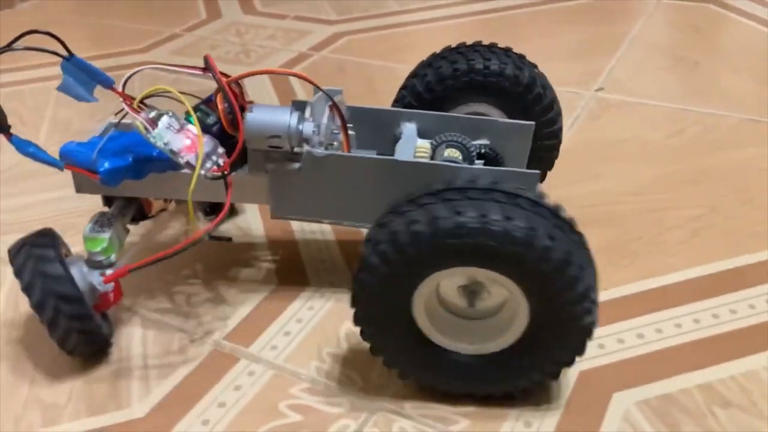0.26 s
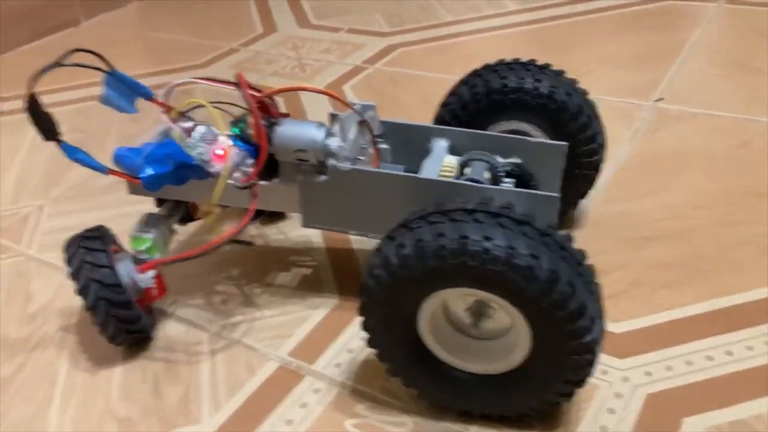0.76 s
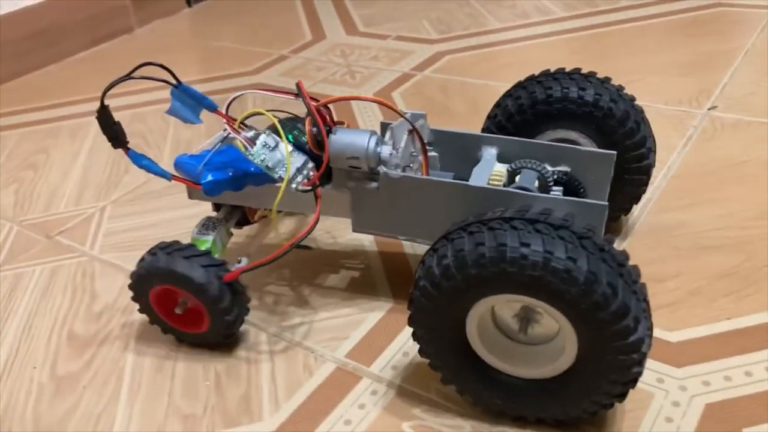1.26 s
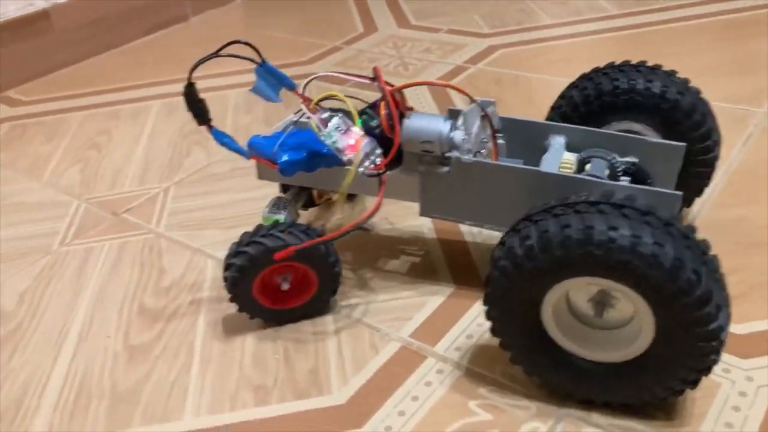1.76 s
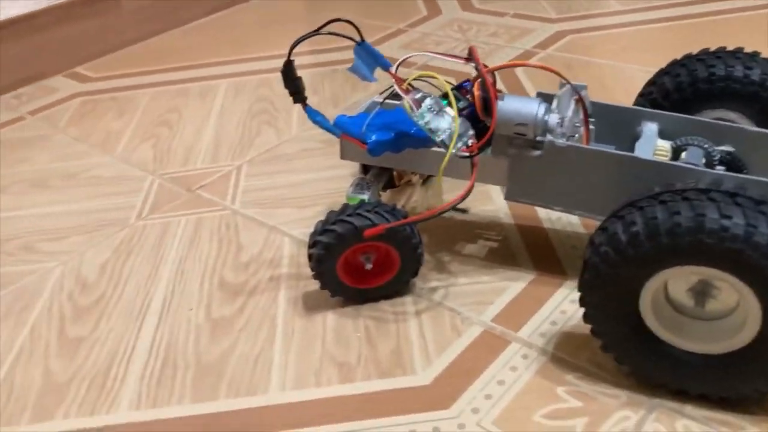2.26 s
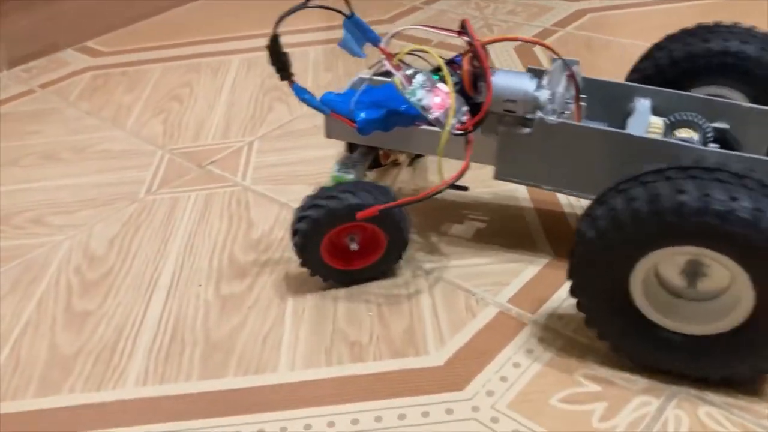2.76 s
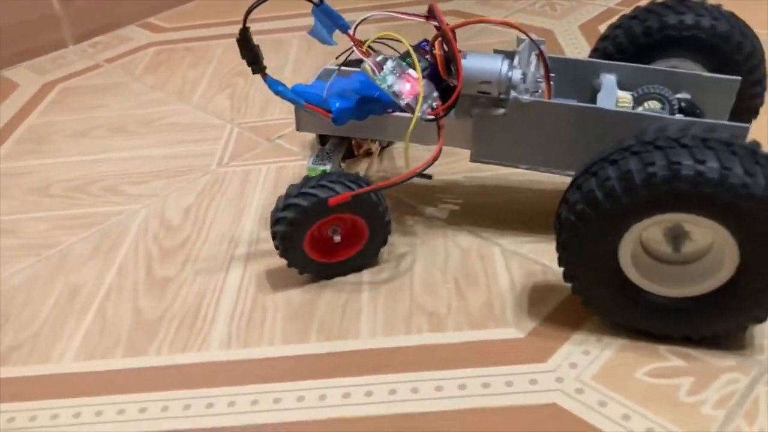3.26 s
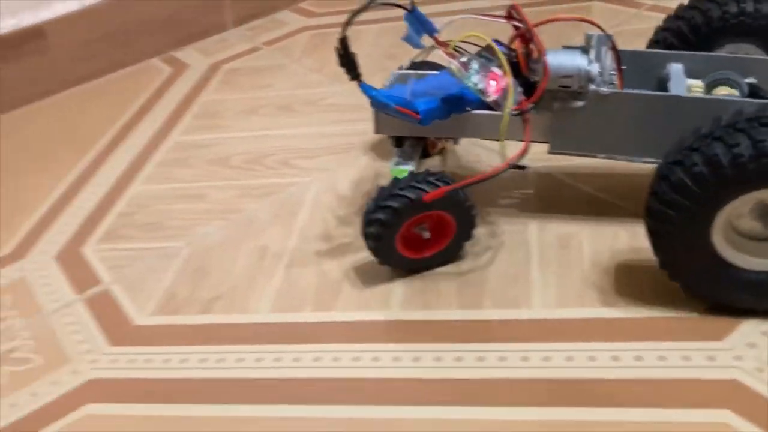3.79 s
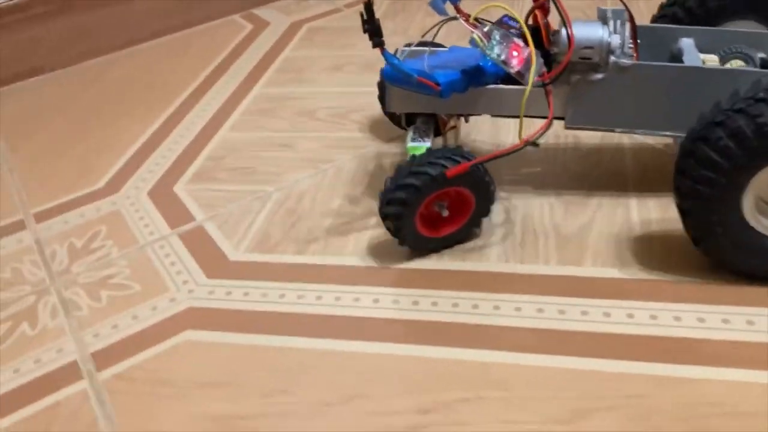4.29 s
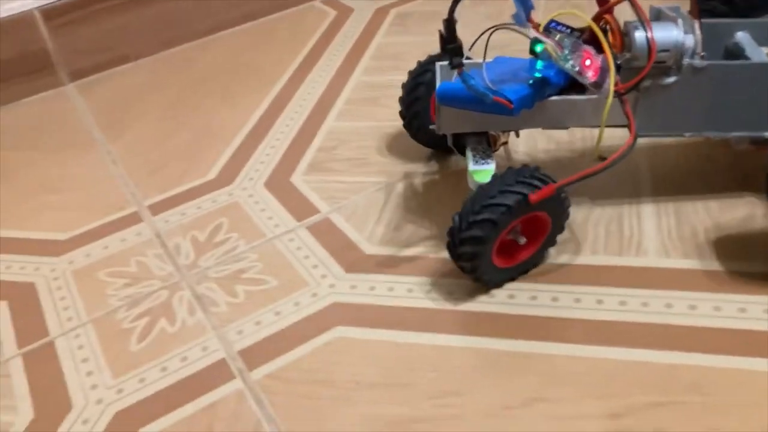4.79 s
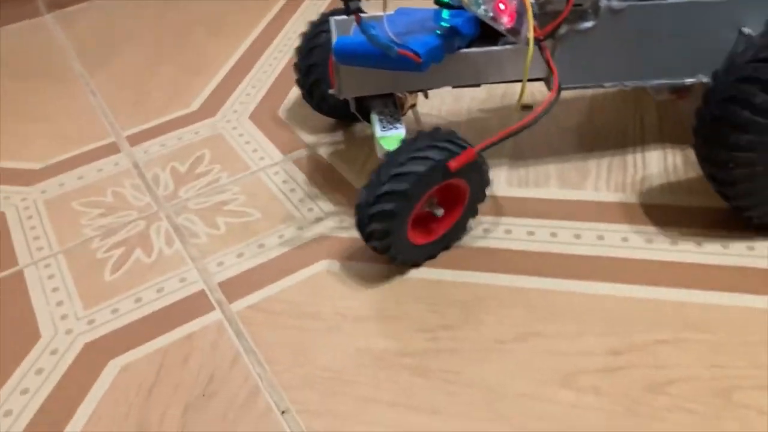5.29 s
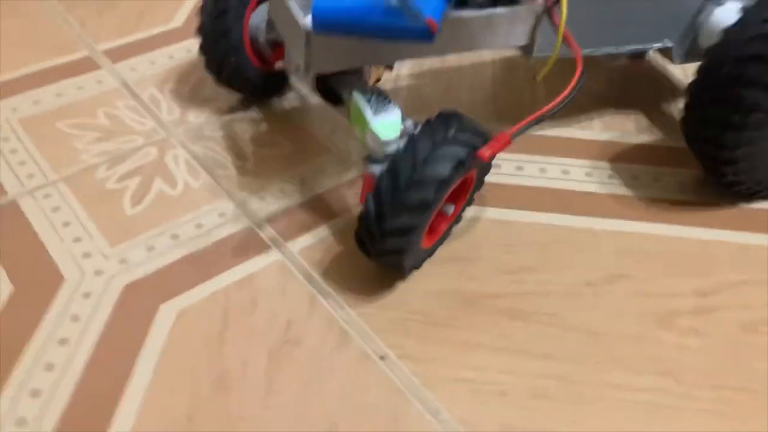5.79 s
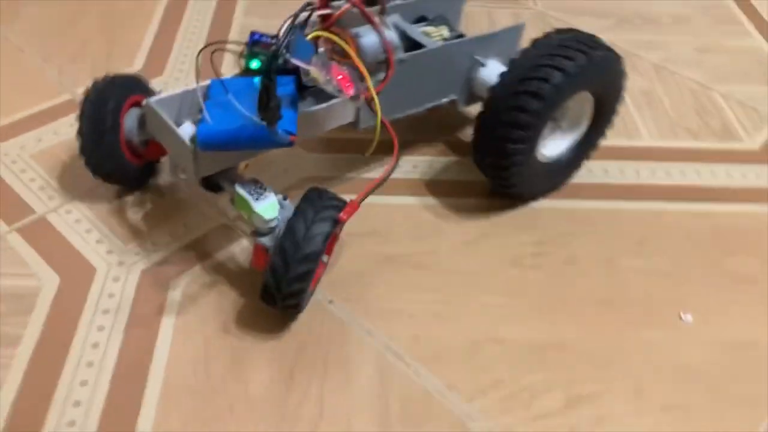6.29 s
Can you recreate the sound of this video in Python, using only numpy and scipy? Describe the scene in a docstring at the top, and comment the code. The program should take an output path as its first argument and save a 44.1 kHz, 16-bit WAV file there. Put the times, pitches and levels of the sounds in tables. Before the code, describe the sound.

Close to the microphone in a room with a hard floor, a toy truck's gear motor rattles brightly and coasts down almost at once. A thinner steering buzz follows with a sharp tick, then a quiet pause with a faint low hum. The motor grinds back to life and whirs steadily to the end, with tyre patter, a hard knock midway and a cluster of ticks and bouncing knocks late.

```python
"""On a hard floor indoors, a toy truck drives close to the microphone, stops, steers and drives on.
Tooth strikes of its gear motor rattle in gears and chassis, and the mesh sings a line with sidebands.
A smaller gear train buzzes as the front wheels steer. Patter and rumble of noise make the tyres.
Dying modes make the chassis knocks, noise bursts the ticks; a low hum swells during the halt.
Room air lies underneath, and two microphone ports hear direct sound and reflections."""
import sys
import numpy as np
from scipy import signal
from scipy.fft import rfft, irfft
from scipy.io import wavfile
from scipy.ndimage import uniform_filter1d

SR = 44100
rng = np.random.default_rng(int(sys.argv[2]) if len(sys.argv) > 2 else 0)


def master_out(mix):
    """Clip the mix to full scale and print it as 16-bit PCM to the path in sys.argv[1]."""
    frames = np.transpose(np.atleast_2d(mix))
    ceiling = np.clip(frames, -1, 1)
    pcm = np.round(ceiling * 32767).astype(np.int16)
    wavfile.write(sys.argv[1], SR, pcm)


N = 288414
TIME = np.arange(N) / SR
BINS = np.fft.rfftfreq(N, 1 / SR)

# Colour of the gear rattle. Each row: frequency in Hz, relative level per Hz in dB.
RATTLE_COLOUR = [(200, -45), (800, -18.5), (1500, -8), (2400, -10), (3200, -4), (4200, -6.5), (5200, -1.5),
                 (6200, -7), (7000, -9.5), (8800, -1), (10500, 3.5), (11300, 0.5), (12100, 6.5),
                 (12700, -1.5), (14500, -6)]
# Colour of the chassis ring. Each row: frequency in Hz, relative level per Hz in dB.
CHASSIS_COLOUR = [(150, -42.5), (450, -11.5), (800, -35), (1050, -15.5), (1320, 2.5), (1480, -5),
                  (1700, 5.5), (2050, -0.5), (2400, -2.5), (3200, -11.5)]
# Dry rasp of the backlash. Each row: frequency in Hz, relative level per Hz in dB.
RASP_COLOUR = [(700, -30), (2000, -3.5), (4300, 0), (6500, -4.5), (10000, -18.5)]
# Bright band near 4 kHz that shifts as floor reflections change with distance.
# Each row: time in seconds, frequency in Hz, level in dB against the rattle.
FLOOR_BAND = [(0, 4565, -11.5), (2.6, 4114, -9.5), (3.3, 4200, -15), (3.9, 4250, -8), (4.5, 4050, -13.5),
              (5.0, 3890, -10), (5.4, 4180, -18), (6.0, 4300, -38), (6.54, 4300, -36)]
# Faint, narrow ring, perhaps of the motor bracket. Each row: time in seconds, level in dB against the rattle.
BRACKET_RING = [(0, -21.5), (2.6, -24), (4.0, -19), (4.6, -17), (5.9, -17), (6.54, -21)]
# Treble sizzle of the gears. Each row: time in seconds, level in dB against the rattle.
SIZZLE_LEVEL = [(0, -7.5), (.3, -7), (2.7, -7.5), (3.3, -7.5), (3.8, -11.5), (4.8, -11), (5.45, -9.5),
                (5.7, -13), (5.95, -8), (6.2, -11), (6.54, -7.5)]
# Loudness of the gear rattle under load. Each row: time in seconds, level in dB before trim and flutter.
RATTLE_LOAD = [(0.1, -29), (2.6, -28.5), (2.8, -28), (3.3, -27), (3.65, -28), (3.9, -27.5), (4.7, -27.5),
               (5.1, -29.5), (5.2, -27), (5.38, -28), (5.48, -26), (5.8, -26.5), (6.2, -27), (6.54, -30.5)]
# How hard the teeth bite under the changing load.
# Each row: time in seconds, whine in dB before trim, chassis ring in dB before trim and flutter.
TOOTH_BITE = [(0, -46.5, -40), (.08, -45, -41), (0.22, -48, -45), (0.31, -43, -40), (0.38, -58, -39),
              (2.55, -54, -40), (2.65, -43.5, -44), (2.73, -56, -51), (2.81, -43, -34), (2.87, -47.5, -44),
              (2.94, -40.5, -39), (3.18, -53, -38), (3.3, -40.5, -38), (3.5, -57, -37.5),
              (3.65, -51, -41.5), (3.92, -49, -37.5), (4.17, -60, -39.5), (4.45, -42, -44.5),
              (4.58, -53.5, -46.5), (4.71, -41.5, -35.5), (4.85, -58, -41.5), (5.0, -56, -39.5),
              (5.15, -45, -37.5), (5.33, -39, -37), (5.55, -49.5, -34.5), (5.9, -55, -42),
              (6.17, -46, -34.5), (6.26, -57, -40.5), (6.33, -43, -42.5), (6.45, -53, -40)]
# Dull grinding of the drive gears at low speed. Each row: time in seconds, level in dB.
GRIND_LEVEL = [(.2, -58), (.33, -46), (.52, -48.5), (.59, -61), (.78, -73), (.84, -91), (2.2, -93),
               (2.33, -88.5), (2.47, -79), (2.53, -40), (2.68, -43), (2.8, -51)]
# Colour of that grinding. Each row: frequency in Hz, relative level per Hz in dB.
GRIND_COLOUR = [(200, -31.5), (450, -3.5), (900, -8.5), (1400, 5.5), (2300, 7), (3500, 1.5), (7000, -7),
                (13000, -23.5)]
RASP_DB = -12  # against the rattle
FLOOR_BAND_WIDTH_HZ = 900
BRACKET_HZ, BRACKET_WIDTH_HZ = 4750, 140
SIZZLE_HZ, SIZZLE_WIDTH_HZ = 7930, 3100
STOP_DB_PER_S = 225  # extra fade once the wheels stop


def rattle(turns):
    """Tooth strikes rattle in the gears and ring the chassis; their backlash adds a dry rasp."""
    def strikes(scrape):
        struck = chatter(turns, clack=.17, loose_db=1.05, scrape=scrape)
        return shifting(struck, patchy_db=.7, wide_hz=350, lasting_s=.1)

    teeth, more_scraped, less_scraped = strikes(1.9), strikes(2.4), strikes(1.4)
    rasp = coloured(backlash(per_s=650, spread_db=3), RASP_COLOUR) * gain_of(RASP_DB)
    floor_band = resonate(less_scraped, curve(FLOOR_BAND), width=FLOOR_BAND_WIDTH_HZ)
    floor_band = floor_band * gain_of(curve(FLOOR_BAND, order=2))
    bracket = resonate(more_scraped, np.full(N, BRACKET_HZ), width=BRACKET_WIDTH_HZ)
    bracket = bracket * gain_of(curve(BRACKET_RING))
    sizzle = resonate(more_scraped, np.full(N, SIZZLE_HZ), width=SIZZLE_WIDTH_HZ)
    sizzle = sizzle * gain_of(curve(SIZZLE_LEVEL))
    gears = coloured(teeth, RATTLE_COLOUR) + rasp + floor_band + bracket + sizzle
    gears = gears * gain_of(curve(RATTLE_LOAD) - 0.84 + 0.57 * drift(45))
    chassis = coloured(more_scraped, CHASSIS_COLOUR)
    chassis = chassis * gain_of(curve(TOOTH_BITE, order=2) - 2.0 + 1.2 * drift(20))
    grinding = level(GRIND_LEVEL) * coloured(less_scraped, GRIND_COLOUR)
    return running(STOP_DB_PER_S) * (gears + chassis) + grinding


# Partials of the gear whine. Each row: multiple of the shaft speed, level in dB before bite and flutter.
WHINE_ORDERS = [(8, -19.5), (9, -13), (10, 3), (11, -5.5), (12, -10.5), (20, -6.5), (25, -5.5), (28, -12.5)]
WHINE_POWER = 1.3  # the whine grows with this power of the speed


def whine(turns):
    """The mesh sings a fine line with sidebands of the shaft."""
    lines = np.zeros(N)
    for multiple, db in WHINE_ORDERS:
        phase = 2 * np.pi * (round(multiple) * turns + rng.random())
        lines += gain_of(db + 2.2 * drift(25)) * np.cos(phase)
    speed = tooth_rate() / curve(CRUISE_MESH)  # 1 at cruising speed
    return running(STOP_DB_PER_S) * lines * gain_of(curve(TOOTH_BITE) + 1.5) * speed ** WHINE_POWER


# Runs of the drive motor. Each row: power on, power off and wheels stopped, all in seconds.
DRIVE_RUNS = [(-1, .21, .5), (2.485, 7, 7.25)]
# Cruising speed of the drive gears. Each row: time in seconds, tooth rate in Hz before wobble.
CRUISE_MESH = [(0, 1755), (0.2, 1673), (2.8, 1601), (2.95, 1671), (3.13, 1669), (3.3, 1753), (3.6, 1577),
               (3.85, 1704), (4.15, 1645), (4.7, 1745), (4.9, 1688), (5.35, 1669), (6.05, 1709),
               (6.2, 1586), (6.33, 1700), (6.54, 1719)]
START_HZ, SPIN_UP_HZ_PER_S, COAST_HZ_PER_S = 1088, 1650, 3300  # tooth rate; START_HZ is at power on
ATTACK_S, COAST_DB_PER_S = 0.045, 36.5


def tooth_rate():
    """The gears spin up to their cruising speed and slow once the power is off."""
    runs = []
    for on, off, _ in DRIVE_RUNS:
        spin_up = START_HZ + SPIN_UP_HZ_PER_S * (TIME - on)
        runs.append(np.minimum(curve(CRUISE_MESH), spin_up) - COAST_HZ_PER_S * since(off))
    return np.maximum(np.max(runs, axis=0), 0)


def running(stop_db_per_s):
    """Gain of the drive: quick start, slow fade while coasting, fast fade when the wheels stop."""
    return sum(envelope(on, off, ATTACK_S, COAST_DB_PER_S) * gain_of(-stop_db_per_s * since(stop))
               for on, off, stop in DRIVE_RUNS)


TEETH = 10  # per turn of the motor shaft


def shaft(mesh_hz, wobble):
    """Turns of a motor shaft whose speed wavers with the load."""
    return np.cumsum(mesh_hz * (1 + wobble * drift(35))) / TEETH / SR


def chatter(turns, clack, loose_db, scrape):
    """Each tooth strikes with its own force; the slower second gear adds a wavering clack."""
    strikes = np.diff(np.floor(turns * TEETH), prepend=0) * rng.standard_normal(N)
    second_teeth = np.cumsum(np.diff(turns, prepend=0) * 1.87 * (1 + .03 * drift(4)))
    force = (1 + clack * np.cos(2 * np.pi * second_teeth)) * gain_of(loose_db * drift(320))
    return evened(force * (evened(strikes) + scrape * rng.standard_normal(N)))


def backlash(per_s, spread_db):
    """Loose teeth slap back at random moments, a few of them hard."""
    size = gain_of(spread_db * np.minimum(rng.exponential(1, N), 3))
    return evened(rng.choice([-1., 1.], N) * size * (rng.random(N) < per_s / SR))


# Speed of the steering gears. Each row: time in seconds, tooth rate in Hz before wobble.
STEER_MESH_RATE = [(.87, 1167), (1.12, 1503), (1.23, 1568), (1.34, 1523), (1.49, 1698), (1.8, 1402)]
# Colour of the steering buzz. Each row: frequency in Hz, relative level per Hz in dB.
STEER_COLOUR = [(150, -15), (450, -18.5), (1000, -15.5), (1600, -5), (2300, -10.5), (4300, -10.5),
                (6000, -8.5), (7400, -0.5), (9000, -5), (12200, -5.5), (14500, -24)]
# Whine of the steering gears. Each row: time in seconds, level in dB against their buzz.
STEER_WHINE_LEVEL = [(1.1, -18), (1.18, -11), (1.27, -7.5), (1.34, -8), (1.41, -14), (1.52, -17),
                     (1.6, -18)]
STEER_ON_S, STEER_OFF_S, STEER_ATTACK_S = 0.87, 1.498, 0.17
STEER_FALL_DB_PER_S, STEER_DB, STEER_WHINE_WIDTH_HZ = 174.5, -48, 160


def steering():
    """A smaller, brighter gear train turns the front wheels, with a fuzzy whine."""
    turns = shaft(curve(STEER_MESH_RATE), wobble=.014)
    buzz = coloured(chatter(turns, clack=0.088, loose_db=1.7, scrape=1.5), STEER_COLOUR)
    fuzz = resonate(rng.standard_normal(N), curve(STEER_MESH_RATE), width=STEER_WHINE_WIDTH_HZ)
    fuzz = level(STEER_WHINE_LEVEL) * fuzz
    sweep = envelope(STEER_ON_S, STEER_OFF_S, STEER_ATTACK_S, STEER_FALL_DB_PER_S)
    return gain_of(STEER_DB) * sweep * (buzz + fuzz)


# Tyres on the floor. Each row: time in seconds, level in dB before trim.
ROLL_LEVEL = [(0.0, -95), (0.33, -72), (0.93, -75), (1.2, -75), (1.43, -70), (1.65, -78.5), (1.96, -83),
              (2.5, -67.5), (2.6, -68), (2.68, -65.5), (3.36, -71), (3.54, -49.5), (3.67, -49.5),
              (3.83, -44), (3.97, -43.5), (4.25, -52), (4.75, -52), (5.05, -66.5), (5.32, -64), (5.46, -52),
              (5.6, -64), (5.92, -49.5), (6.08, -48), (6.3, -55), (6.54, -60.5)]
# Colour of the tyre patter. Each row: frequency in Hz, relative level per Hz in dB.
TYRE_COLOUR = [(30, -29.5), (80, -26), (135, -19.5), (205, 9), (320, 6.5), (450, 4.5), (550, -0.5),
               (1000, -5), (2000, -34)]
# Deep rumble of the rolling wheels. Each row: time in seconds, level in dB.
RUMBLE_LEVEL = [(0, -87), (1.1, -87.5), (1.5, -69), (1.68, -75), (1.8, -68), (2.05, -77), (2.3, -82),
                (4.6, -75), (5.8, -67.5), (6.54, -70.5)]
# Colour of the rumble. Each row: frequency in Hz, relative level per Hz in dB.
RUMBLE_COLOUR = [(25, -17.5), (55, 1), (90, 5.5), (150, -3), (300, -23.5), (600, -38.5)]


def tyres():
    """Tread blocks patter unevenly on the floor, over a deep rumble."""
    patter = rng.standard_normal(N) * gain_of(2 * drift(25))
    patter = gain_of(-3.5) * level(ROLL_LEVEL) * coloured(patter, TYRE_COLOUR)
    rumble = level(RUMBLE_LEVEL) * coloured(rng.standard_normal(N), RUMBLE_COLOUR)
    return patter + rumble


# Chassis knocks. Each row: start in seconds, level in dB, pitch that the struck place favours in Hz,
# tyre bounce in dB against the frame ring.
KNOCK_EVENTS = [(.583, -45, 616, -11), (1.003, -54.5, 454, -15), (1.09, -48, 520, -18),
                (1.491, -51.5, 520, 2), (1.953, -67, 220, 7), (2.169, -56, 900, -9), (3.631, -48, 381, -10),
                (3.7495, -41, 620, -30), (3.7546, -25, 362, -33), (5.656, -25.5, 857, -29),
                (6.036, -37, 493, -23), (6.204, -36, 490, -3)]
# What a knock rings with. Each row: frequency in Hz, relative level in dB, t60 in seconds.
FRAME_MODES = [(209.6, -6, 0.37), (398, 8.5, 0.041), (500, -7.5, 0.23), (633, 8, 0.036), (920, 12.5, 0.019),
               (1400, -10, 0.017)]
# What the tyres bounce with. Each row: frequency in Hz, relative level in dB, t60 in seconds.
BOUNCE_MODES = [(86, -3, 0.2), (112, 2, 0.13), (150, -6.5, 0.22), (200, 8, 0.033)]


def knocks():
    """Blows ring the frame, and some add a low bounce of the tyres."""
    out = np.zeros(N)
    for s, db, favoured_hz, bounce_db in KNOCK_EVENTS + rebounds():
        bounce = gain_of(bounce_db) * ringing(BOUNCE_MODES, favoured_hz)
        blow = gain_of(db) * (ringing(FRAME_MODES, favoured_hz) + bounce)
        part = out[round(s * SR):][:len(blow)]
        part += blow[:len(part)]
    # so small a body radiates no deep bass
    return signal.sosfilt(signal.butter(3, 62, "high", fs=SR, output="sos"), out)


# after the hard knock at 5.656 s the truck drops on its tyres and rebounds, each time sooner and softer
DROP_S, DROP_DB, DROP_HZ, DROP_BOUNCE_DB = 5.665, -35.5, 229.8, 8
REBOUND_S, REBOUND_SHARE, REBOUND_LOSS_DB = 0.028, 0.68, 3.5  # first gap, gap ratio, loss per rebound
REBOUND_DULLING = 0.68  # share of the favoured pitch that each rebound keeps


def rebounds(count=5):
    """The drop and its rebounds, as knocks."""
    gaps = REBOUND_S * REBOUND_SHARE ** np.arange(count)
    return [(DROP_S + gaps[:k].sum(), DROP_DB - REBOUND_LOSS_DB * k,
             DROP_HZ * REBOUND_DULLING ** k, DROP_BOUNCE_DB) for k in range(count)]


FAVOUR_OCTAVES = 0.72  # how far from the favoured pitch a blow still reaches


def ringing(modes, favoured_hz):
    """Dying modes after one blow, at peak 1; those near the favoured pitch ring most."""
    t = np.arange(SR // 2) / SR
    ring = np.zeros(len(t))
    for hz, db, t60 in modes:
        favour = 1 / (1 + (np.log2(hz / favoured_hz) / FAVOUR_OCTAVES) ** 2)
        ring += favour * gain_of(db - 60 * t / t60) * np.cos(2 * np.pi * hz * t)
    ring = ring * (1 - np.exp(-t / 0.0016))  # soft contact
    return ring / abs(ring).max()


# Sharp ticks of the steering linkage and the gears. Each row: start in seconds, level in dB.
TICK_EVENTS = [(1.041, -30), (1.0884, -23.5), (1.0908, -32), (1.733, -57), (2.31, -68.5), (3.2713, -28),
               (5.5375, -28), (5.5816, -19), (6.2246, -24)]


def ticks(t60=0.013):
    """Hard plastic snaps with a very short ring, made of bright noise."""
    bursts = sum((TIME >= s) * gain_of(db - 60 * abs(TIME - s) / t60) for s, db in TICK_EVENTS)
    colour = [(500, -54), (2500, 5), (6500, 2), (12000, 11.0), (15000, 10.5)]  # Hz, dB per Hz
    return bursts * coloured(rng.standard_normal(N), colour)


# Low hum during the halt, in three swells. Each row: time in seconds, level in dB.
HUM_LEVEL = [(1.27, -76), (1.39, -74), (1.47, -59), (1.53, -65), (1.61, -51), (1.69, -55.5), (1.785, -46),
             (1.82, -53.5), (1.87, -52.5), (2.28, -77)]
# Faint whine just before the truck moves off. Each row: frequency in Hz, level in dB before trim and swell.
STRAIN_TONES = [(870, -74), (1072, -83), (1650, -84.5)]
HUM_HZ = 48.4


def halt():
    """A low hum swells unevenly and fades; a faint, wavering whine comes before the truck moves off."""
    hum_hz = HUM_HZ * (1 + 0.032 * drift(6.4))
    hum = level(HUM_LEVEL) * np.sin(2 * np.pi * np.cumsum(hum_hz) / SR)
    strain = np.zeros(N)
    for hz, db in STRAIN_TONES:
        tone = resonate(rng.standard_normal(N), hz * (1 + 0.025 * drift(7.3)), width=hz / 7)
        strain += gain_of(db - 2 + 3.2 * drift(7.8)) * tone
    return hum + strain * level([(2.18, -15), (2.33, 4.5), (2.48, -3.5)])


# Room background. Each row: frequency in Hz, relative level per Hz in dB.
AIR_COLOUR = [(25, -6), (80, 2), (200, 1.5), (450, -16), (900, -15), (2200, -17.5), (3500, -29.5),
              (7500, -37.5), (10000, -19), (12300, -16), (14500, -40)]


def room_air():
    """Steady coloured noise of the room."""
    return gain_of(-78.0) * coloured(rng.standard_normal(N), AIR_COLOUR)


# The two microphone ports. Each row: frequency in Hz, likeness of the two channels from 0 to 1,
# right lead in radians, left over right in dB.
PORT_RESPONSE = [(60, .98, 0, -1.5), (350, .95, 0, -2.2), (1100, .68, -.3, .5), (1800, .2, -.3, .7),
                 (3000, .42, -2.5, 0), (4200, .2, -1.5, 0), (5300, .35, -3.3, 0), (6100, .3, -1.2, 0),
                 (7000, .97, 0, 0), (8000, .8, 1.4, 0), (8700, .93, 2.5, 0), (9200, .995, np.pi, 0),
                 (9600, .96, 3.6, 0), (10300, .8, 4.7, 0), (11300, .98, 2 * np.pi, 0), (12500, .66, 7.7, 0),
                 (13300, .998, 3 * np.pi, 0)]


def ports(x, likeness, size):
    """Both ports share one sound, slightly apart in time; unrelated room reflections fill the rest."""
    lead, balance_db = (read(PORT_RESPONSE, BINS, column) for column in (2, 3))
    shared = rfft(x) * np.sqrt(likeness) * np.array([np.ones(len(BINS)), np.exp(1j * lead)])
    reflected = rfft(room(x, size=size)) * np.sqrt(1 - likeness)
    return irfft((shared + reflected) * gain_of([balance_db / 2, -balance_db / 2]), N)


def room(x, size):
    """The truck and the microphone keep moving, so each short stretch meets new reflections."""
    padded, out = np.pad(x, size), np.zeros((2, N + 2 * size + SR))
    for start in range(0, N + size, size // 2):
        stretch = padded[start:start + size] * signal.windows.cosine(size)
        wet = signal.fftconvolve(stretch[None], room_tail(), axes=1)
        out[:, start:start + wet.shape[1]] += wet
    return out[:, size:size + N]


# Decay of the room. Each row: frequency in Hz, t60 in seconds before the early boost.
ROOM_DECAY = [(100, 0.28), (1000, 0.82), (5000, 0.61), (13000, 0.06)]


def room_tail():
    """Sparse reflections of random sign, each band dying at its own speed, unrelated in the two channels."""
    taps = rng.choice([-1., 1.], (2, SR // 4)) * (rng.random((2, SR // 4)) < .08)
    taps[:, :SR // 800] = 0
    hz, t, z = signal.stft(taps, SR, nperseg=256)
    early = 1 + 12 * np.exp(-t / 0.011)  # floor and chassis are close by
    decay = gain_of(-60 * t / read(ROOM_DECAY, hz)[:, None])
    tail = signal.istft(z * early * decay, SR, nperseg=256)[1]
    return tail / np.linalg.norm(tail, axis=1, keepdims=True)


def shifting(x, patchy_db, wide_hz, lasting_s):
    """The colour drifts in random patches of frequency and time, at rms 1."""
    hz, t, z = signal.stft(x, SR, nperseg=512)
    kernel = np.outer(np.hanning(2 * round(wide_hz / hz[1])), np.hanning(2 * round(lasting_s / t[1])))
    patches = evened(signal.fftconvolve(rng.standard_normal(z.shape), kernel, "same"))
    return evened(signal.istft(z * gain_of(patchy_db * patches), SR, nperseg=512)[1][:N])


def resonate(x, hz, width):
    """A resonance that follows the curve hz, at rms 1: a double pole on a turning carrier."""
    turn, r = np.exp(2j * np.pi * np.cumsum(hz) / SR), np.exp(-np.pi * width / SR)
    return evened((turn * signal.lfilter([1], [1, -2 * r, r * r], x / turn)).real)


def coloured(x, spectrum):
    """Gives x a spectrum, thinned below 20 Hz, at rms 1."""
    low_cut = BINS / np.hypot(BINS, 20)
    return evened(irfft(rfft(x) * gain_of(read(spectrum, BINS)) * low_cut, N))


def drift(hz):
    """Slow chance up to the given rate, rms 1."""
    return evened(irfft(rfft(rng.standard_normal(N)) / (1 + (BINS / hz) ** 4), N))


def envelope(on, off, attack_s, fall_db_per_s):
    """Rises, holds, and dies away after off."""
    return (1 - np.exp(-since(on) / attack_s)) * gain_of(-fall_db_per_s * since(off))


def since(s):
    """Seconds gone by after s, zero before."""
    return np.maximum(TIME - s, 0)


def level(rows, order=1):
    """Gain from a dB column, silent outside its span, with softened edges."""
    inside = (TIME >= rows[0][0]) & (TIME <= rows[-1][0])
    return gain_of(curve(rows, order)) * uniform_filter1d(inside * 1., size=300)


def curve(rows, order=1):
    """Reads one column of a time table at every sample."""
    table = np.transpose(rows)
    return np.interp(TIME, table[0], table[order])


def read(points, hz, column=1):
    """Reads a table on a log-frequency axis."""
    table = np.transpose(points)
    return np.interp(np.log(hz + 1), np.log(table[0] + 1), table[column])


def evened(x):
    """Scales to rms 1."""
    return x / np.sqrt(np.mean(x ** 2) + 1e-20)


def gain_of(db):
    """Amplitude factor of a level in dB."""
    return 10 ** (np.asarray(db) / 20)


WHINE_LIKENESS = .75  # of the whine in the two channels


def scene():
    """The noises are alike in the two channels band by band; the whine is equally alike in all bands."""
    turns = shaft(tooth_rate(), wobble=.0075)
    noises = rattle(turns) + steering() + tyres() + knocks() + ticks() + halt() + room_air()
    spread = ports(noises, read(PORT_RESPONSE, BINS), size=6400)
    return spread + ports(whine(turns), WHINE_LIKENESS, size=24000)


EDGE_HZ = 14200


def record(dry):
    """The recorder's band limit: a steep low-pass at EDGE_HZ."""
    low_pass = signal.firwin(255, EDGE_HZ, window=("kaiser", 9), fs=SR)
    return signal.oaconvolve(dry, low_pass[None], "same")


dry = scene()
out = record(dry)
master_out(out)
```